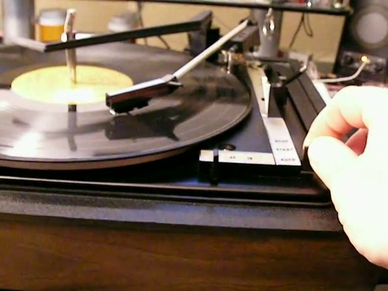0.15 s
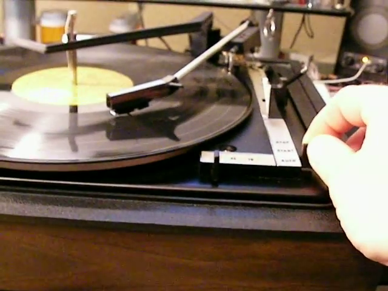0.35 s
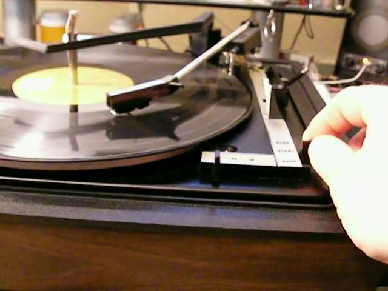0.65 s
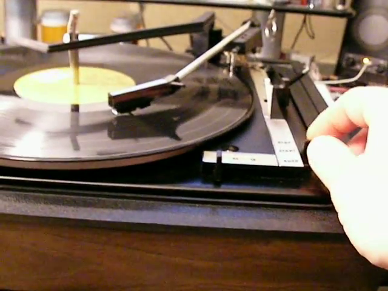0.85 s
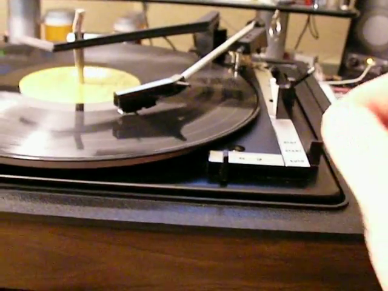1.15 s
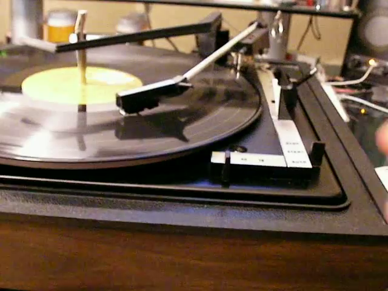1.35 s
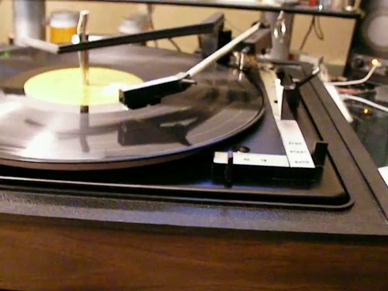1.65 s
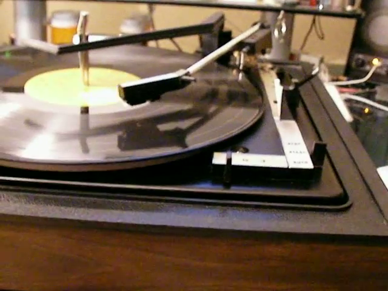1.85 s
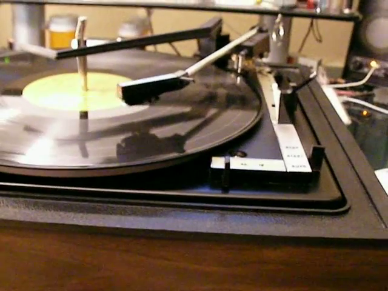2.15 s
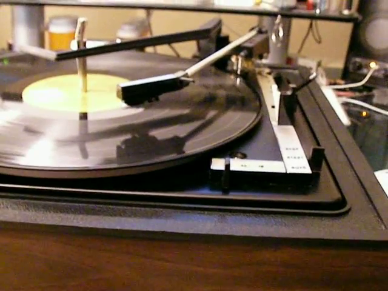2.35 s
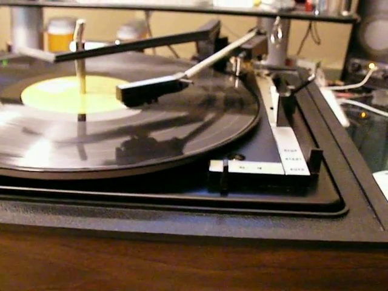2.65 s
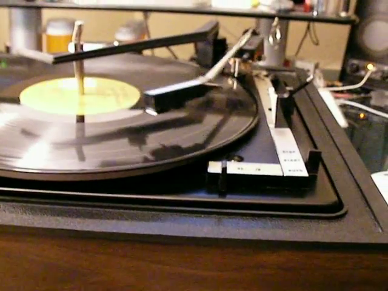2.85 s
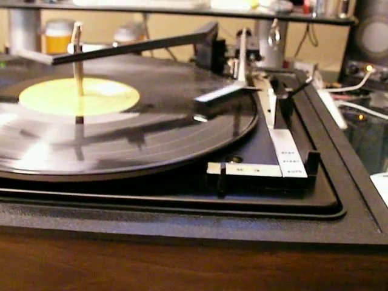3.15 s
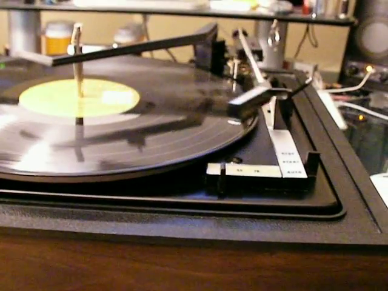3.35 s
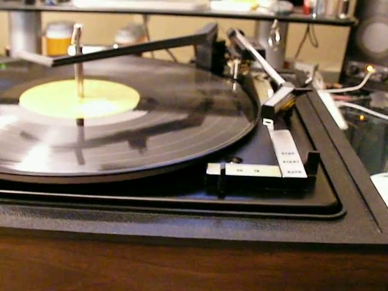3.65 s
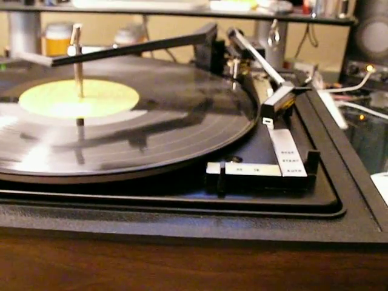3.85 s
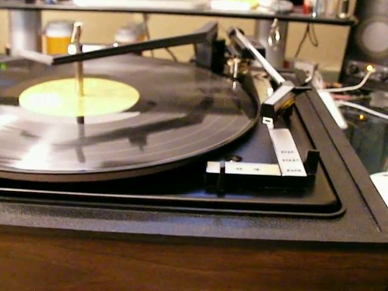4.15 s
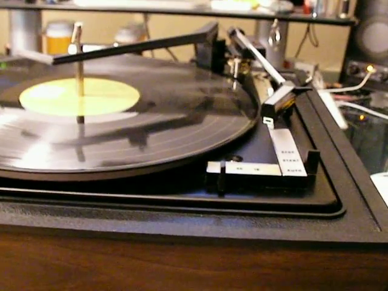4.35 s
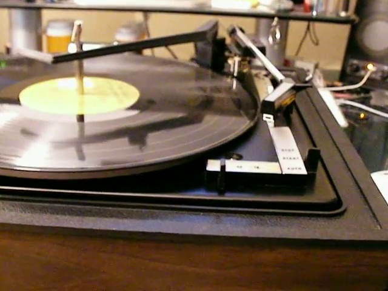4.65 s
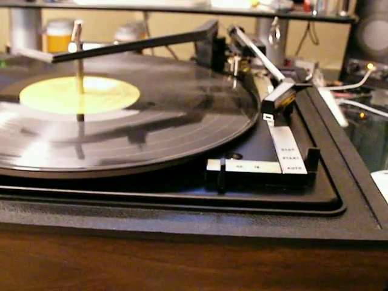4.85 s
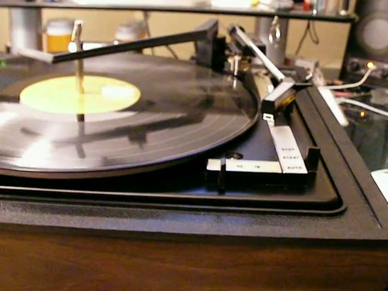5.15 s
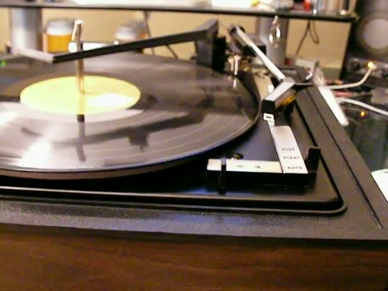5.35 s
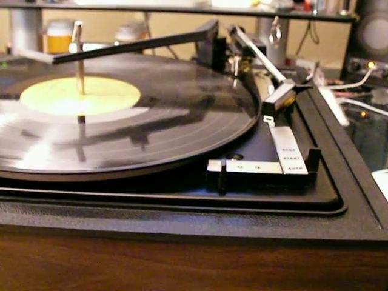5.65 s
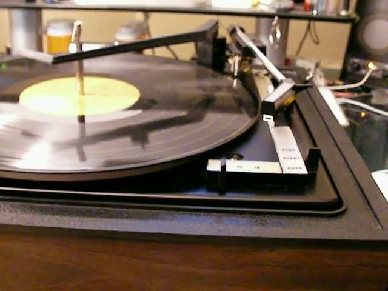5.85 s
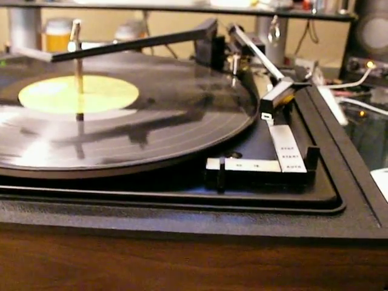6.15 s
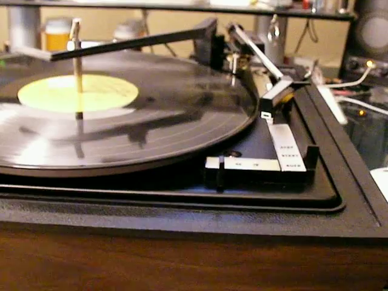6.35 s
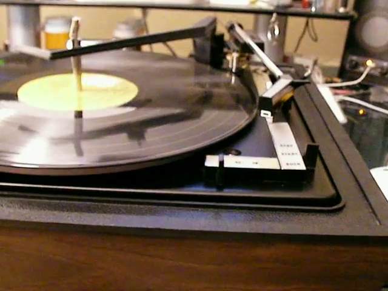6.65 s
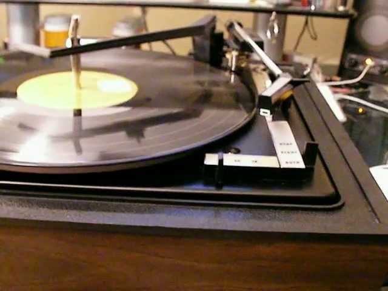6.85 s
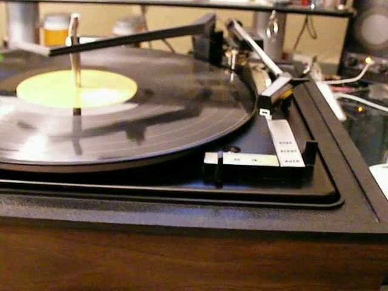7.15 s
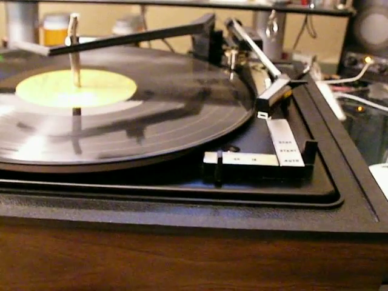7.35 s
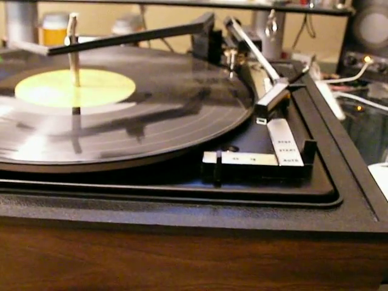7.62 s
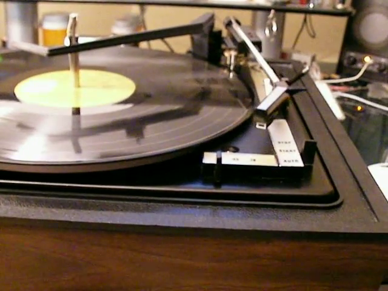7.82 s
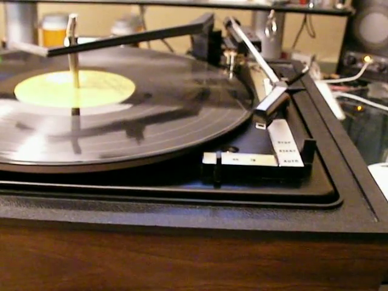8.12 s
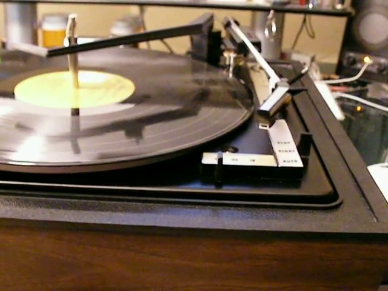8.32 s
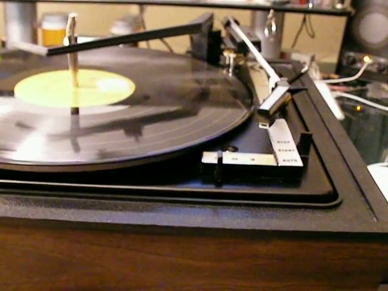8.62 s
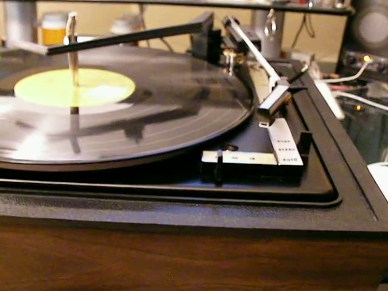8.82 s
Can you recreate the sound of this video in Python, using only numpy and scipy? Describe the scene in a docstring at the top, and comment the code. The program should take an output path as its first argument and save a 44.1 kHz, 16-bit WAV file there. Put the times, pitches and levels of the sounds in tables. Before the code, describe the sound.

Metal levers and latches snap, tick and knock on a wooden-cased turntable. An opening cluster with dull thumps gives way to only hum and hiss, then scattered clicks and a brief scrape, another pause, bright clacks with a short singing lever, light ticks, and a heavy final clatter. The sound is dry and close, with short indoor reflections and a slightly noisy stereo microphone.

```python
"""Crisp clicks, clacks and dull knocks: a record changer runs through its cycle on a wooden cabinet, heard close up.
A hand trips the lever, cams and latches click as the arm lifts and swings out, and the switch clunks off: each
contact is a set of ringing metal modes under a crack of noise. A long lever sings, parts rasp along the cam, and
the sprung deck shudders as low resonances. Behind them the motor hums in sines on multiples of the mains, over
a steady hiss of shaped noise in a small room. A small stereo microphone colours it all."""
import sys
import numpy as np
from scipy import signal
from scipy.fft import rfft, irfft, next_fast_len
from scipy.io import wavfile
from scipy.ndimage import uniform_filter1d, map_coordinates

SR = 44100
rng = np.random.default_rng(int(sys.argv[2]) if len(sys.argv) > 2 else 0)


def wav_out(sig):
    """Save sig, one row per channel (or a flat mono array), as 16-bit PCM at SR to the path in sys.argv[1]."""
    wavfile.write(sys.argv[1], SR, np.round(np.clip(np.atleast_2d(sig).T, -1, 1) * 32767).astype(np.int16))


N = 396194


def amp(db):
    """Gain of a dB value."""
    return 10 ** (np.asarray(db) / 20)


def unit(x):
    """x at rms 1."""
    return x / np.sqrt(np.mean(x ** 2) + 1e-20)


def along(points, hz):
    """Read (Hz, value) points at any frequency, on a log axis."""
    point_hz, value = np.transpose(points)
    return np.interp(np.log(hz + 1), np.log(point_hz + 1), value)


def curve(rows):
    """Gain per sample through (s, dB) rows, silent outside them."""
    time_s, level_db = np.transpose(list(rows))
    return amp(np.interp(np.arange(N) / SR, time_s, level_db, left=-150, right=-150))


def wobble(rate):
    """A smooth random curve with rate knots a second."""
    knots = rng.standard_normal(int(N * rate / SR) + 4)
    return map_coordinates(knots, [np.arange(N) * rate / SR])


def filtered(x, response):
    """x shaped by a complex response of frequency."""
    size = next_fast_len(N + SR // 2)
    return irfft(rfft(x, size) * response(np.fft.rfftfreq(size, 1 / SR)), size)[..., :N]


def resonance(f, hz, width_hz):
    """Causal response of one mode, 1 at its centre."""
    return 1j * f * width_hz / (hz * hz - f * f + 1j * f * width_hz)


# modes of the metal mechanism: pitch_hz [Hz], level_db [dB], t60_s [s, at ring scale 1]
METAL_MODES = [(706, -10.5, 0.75), (831, -3, 0.55), (1004, 0, 0.37), (1399, 0, 0.14), (1970, 4.5, 0.065),
               (2770, -4, 0.08), (3384, -20, 0.11), (3430, 4.5, 0.014), (3944, -1.5, 0.041),
               (4600, -3.5, 0.051), (6530, -4, 0.099), (11340, -6.5, 0.02), (13400, -12, 0.014)]


def metal(f, width):
    """Response of the mechanism, each mode as wide as a share of its pitch, in alternating polarity."""
    return sum((-1) ** k * amp(db) * resonance(f, hz, width * hz)
               for k, (hz, db, _) in enumerate(METAL_MODES))


# parts a contact sets off (cabinet, plate, levers, pins, springs): low_hz [Hz], high_hz [Hz]
PART_BANDS = [(600, 1250), (1400, 2500), (2800, 4600), (4700, 7300), (8700, 13900)]
SNAP_DB, SNAP_T60_S = 7, .032  # first touch, before the band is levelled; t60 at ring scale 1
TOUCH_S, SOFT_S = .0006, .002  # rise of a contact; rise added at ring scale 1
CHATTER_DB, MODE_SPREAD_DB = 3.5, 2  # unevenness of the rattle; scatter of the modes from blow to blow


def struck(band_db, scale):
    """One contact: in each band the modes ring at new strengths under a crack of noise; the mid peaks at its dB."""
    t = np.arange(SR // 5) / SR
    f = np.fft.rfftfreq(len(t), 1 / SR)
    colour = np.abs(metal(f, width=.07)) + amp(-5)  # the noise leans toward the modes
    hz, db, t60_s = np.transpose(METAL_MODES)[..., None]
    strength, detune = rng.standard_normal((2, len(METAL_MODES), 1))

    # loose parts blur each ring
    drift = .04 * np.cumsum(rng.standard_normal((len(METAL_MODES), len(t))), axis=1)
    ring_gain = amp(db + MODE_SPREAD_DB * strength - 60 * t / (scale * t60_s))
    rings = ring_gain * np.sin(2 * np.pi * hz * (1 + 0.009 * detune) * t + drift)

    # loose parts touch unevenly
    knots = rng.standard_normal(len(t) // 128 + 4)
    chatter = amp(CHATTER_DB * map_coordinates(knots, [np.arange(len(t)) / 128]))
    snap = amp(SNAP_DB - 60 * t / (scale * SNAP_T60_S))
    touch = 1 - np.exp(-(t / (TOUCH_S + SOFT_S * scale ** 3)) ** 2)

    total = 0
    for (low, high), level_db in zip(PART_BANDS, band_db):
        band = 1 / np.sqrt((1 + (f / high) ** 12) * (1 + (low / (f + 1)) ** 12))
        noise = rfft(rng.standard_normal((2, len(t))))
        shared, apart = unit(irfft(noise * band * colour, len(t)))
        apart = apart * np.clip(low / 8000, 0, .55)  # short waves reach the two ports unlike
        fade_db = -60 * t / scale * (low / 1250) ** 0.3  # small parts come to rest sooner
        rattle = amp(-5.5 + fade_db / 0.39)
        settling = amp(-6.5 + fade_db / 0.11)
        force = snap + chatter * (rattle + settling)
        crack = force * np.array([shared + apart, shared - apart])
        in_band = (hz[:, 0] > low) & (hz[:, 0] < high)
        part = (rings[in_band].sum(0) + crack) * touch
        total = total + amp(level_db) * part / np.abs(part.mean(0)).max()
    return total


# decay of the small room: pitch_hz [Hz], t60_s [s]
ROOM_DECAY = [(300, 0.35), (2000, 0.27), (10000, 0.15)]


def echoes(x):
    """A fresh noise tail of the room for one sound; each frequency dies at its own speed."""
    hz, t, z = signal.stft(rng.standard_normal((2, SR // 3)), SR, nperseg=256)
    fading = amp(-60 * t / along(ROOM_DECAY, hz)[:, None])
    tail = signal.istft(z * fading, SR, nperseg=256)[1]
    late = np.pad(x, (150, 0))  # delay in samples
    return signal.fftconvolve(late[None], tail / np.linalg.norm(tail[0]), axes=1)


# contacts of the mechanism: start_s [s], plate_db [peak dB], lever_db [dB above the plate],
# hard_db [hardness: pins, dB above the plate], weight_db [cabinet knock, dB above the plate],
# ring_scale [times the decay, held within 0.2 to 3]; dB before room and microphone
CONTACTS = [(0.098, -43, 9, -1, -6, 0.61), (0.381, -23.5, 9.5, 11.5, -30, 0.17),
            (0.5242, -17.5, 0.5, -18, -11, 0.37), (0.571, -32.5, -4, -17, -5, 0.85),
            (0.607, -30, 3, 0, -22, 0.59), (0.881, -31.5, -5, -10.5, -13, 0.76),
            (1.102, -45, 2, 1.5, -15, .4), (2.745, -28, -3, -5.5, -7, 0.67),
            (3.3223, -39, -4.5, -18, -13, 0.73), (3.4416, -21.5, -2, -3, -14, 0.54),
            (3.61, -41.5, -2.5, -10, -2, 0.66), (3.874, -34, -6, -23, -20, 0.85),
            (3.885, -39.5, 7, -13, -15, 0.66), (3.933, -23, 7.5, 4, -9, 0.58),
            (4.042, -28.5, -1.5, -13.5, -11.5, 0.44), (5.221, -12.5, -1.5, -19, -29, 0.23),
            (5.3395, -31.5, -6, -17, -4, 0.69), (5.6143, -20, 0.5, -23, -22, 0.36),
            (5.936, -31.5, -5, -17, -14, 0.92), (5.988, -25, -6, -22.5, -34, 0.51),
            (6.0013, -24.5, -9.5, -27, -12.5, 0.81), (6.065, -39.5, 3.5, -7.5, -19, 0.52),
            (6.7376, -30, -1.5, -9, -7.5, 0.75), (7.27, -42, -2, -18, -15, 1.1),
            (7.625, -38, -5, -22, -4.5, 0.74), (7.7354, -35, -4.5, -20, -9, 0.81),
            (7.786, -43.5, 5, -2, -12, 0.67), (8.08, -17, 1.5, -15.5, -35, 0.2),
            (8.168, -20, -4, -7, -22, 0.96), (8.1747, -25, 2, 1, -12, 0.44),
            (8.179, -13.5, -2, -6, -14, 0.31), (8.1834, -30.5, 1, 18, 2.5, 0.17),
            (8.187, -31.5, 19.5, 15, -24, 0.4), (8.2167, -33.5, 8.5, 2, 1.5, 0.82),
            (8.3767, -23.5, 3.5, 8, -6, 0.47), (8.391, -28, 3, -6, -5, 0.65)]
# springs answer harder contacts more: base_db [dB above the plate at hardness 0], slope [dB per dB of hardness]
SPRING_REACH = (-1.1, 1.18)


def clicks():
    """Each contact reaches the parts of the mechanism by its hardness and weight, and the room answers."""
    out = np.zeros((2, N + SR))
    for start_s, plate_db, lever_db, hard_db, weight_db, ring_scale in CONTACTS:
        spring_db = SPRING_REACH[0] + SPRING_REACH[1] * hard_db
        above_plate_db = np.array([weight_db, 0, lever_db, hard_db, spring_db])
        blow = struck(plate_db + above_plate_db, np.clip(ring_scale, .2, 3))
        wet = amp(-8) * echoes(blow.mean(0))
        start = round(start_s * SR)
        out[:, start:start + blow.shape[1]] += blow
        out[:, start:start + wet.shape[1]] += wet
    return out[:, :N]


# a long lever springs back after the heavier contacts and sings:
# start_s [s], level_db [dB before rise, throb and decay], t60_s [s]
LEVER_TWANGS = [(.53, -31, 0.13), (5.235, -30, 0.3), (5.342, -36, 0.14), (5.62, -35.5, 0.18),
                (8.089, -26.5, 0.14), (8.25, -37.5, 0.53), (8.391, -37.5, 0.44)]
TWANG_HZ, TWANG_RISE_S = 1647, 0.0052
THROB_DEPTH, THROB_HZ = .6, 85


def twangs():
    """The long lever as one drifting mode that swells, throbs and dies."""
    out, t = np.zeros(N + SR), np.arange(SR // 3) / SR
    for start_s, level_db, t60_s in LEVER_TWANGS:
        drift = .07 * np.cumsum(rng.standard_normal(len(t)))
        throb = 1 + THROB_DEPTH * np.cos(2 * np.pi * (THROB_HZ * t + rng.random()))
        rise = 1 - np.exp(-(t / TWANG_RISE_S) ** 2)
        decay = amp(level_db - 60 * t / t60_s)
        start = round(start_s * SR)
        out[start:start + len(t)] += decay * rise * throb * np.sin(2 * np.pi * TWANG_HZ * t + drift)
    return out[:N]


# parts sliding on the cam: start_s [s], rise_s [s], hold_s [s], fall_s [s], rasp_db [rms dB of the rasp in the hold]
CAM_SLIDES = [(0.306, 0.057, 0.033, 0.49, -43), (3.81, 0.11, 0.016, .05, -41.5),
              (8.128, 0.027, 0.26, 0.25, -42)]
# colour of the rasp: pitch_hz [Hz], level_db [relative dB per Hz]
RASP_COLOUR = [(300, -8), (700, -6), (1200, -3), (1700, -1), (2500, -8), (5000, -6), (7000, -13.5),
               (11500, -14.5), (14000, -43)]
SLIDE_EDGE_DB = -32.5  # a slide rises from and falls to this far under its level
# loose parts chattering in a slide: mean rate, scatter of the ticks, level over the rasp
RATTLE_PER_S, RATTLE_SPREAD_DB, RATTLE_DB = 800, 3, 0


def slides():
    """Metal on metal: a rasp of noise, and dense uneven ticks that ring the mechanism."""
    a, b = filtered(rng.standard_normal((2, N)), lambda hz: amp(along(RASP_COLOUR, hz)))
    rasp = unit(amp(0.27 * wobble(56)) * np.array([a + .5 * b, a - .5 * b]))

    hits = rng.random(N) < RATTLE_PER_S / SR
    strength = amp(RATTLE_SPREAD_DB * rng.standard_normal(N))
    ticks = hits * strength * np.sign(rng.standard_normal(N))
    rattle = unit(filtered(ticks, lambda hz: metal(hz, width=0.2) * amp(along(RASP_COLOUR, hz))))

    strokes = 0
    for start_s, rise_s, hold_s, fall_s, rasp_db in CAM_SLIDES:
        corners_s = np.cumsum([start_s, rise_s, hold_s, fall_s])
        corners_db = rasp_db + SLIDE_EDGE_DB * np.array([1, 0, 0, 1])
        strokes = strokes + curve(zip(corners_s, corners_db))
    return strokes * (rasp + amp(RATTLE_DB) * rattle)


# modes of the sprung deck: pitch_hz [Hz], width_hz [Hz, when pushed], level_db [dB]
DECK_MODES = [(137.6, 11.7, -2.5), (214.5, 5.4, -10), (250.6, 11.8, -3), (305.5, 17, -15)]
# pushes on the deck: start_s [s], push_db [dB, added to each mode's level],
# low_db [dB added to the lowest mode], length_s [s]
DECK_PUSHES = [(0.207, -39, -9, 0.015), (0.25, -38.5, -17, 0.028), (0.396, -18.5, -8.5, 0.052),
               (0.528, -27, -11, 0.011), (0.569, -21, -7, 0.02), (0.655, -25, -8, 0.036),
               (0.714, -28, 1.5, 0.023), (0.762, -40, 9, 0.013), (0.811, -33, -0.5, 0.033),
               (1.183, -37, -7, 0.03), (1.351, -26, 1.5, 0.018), (5.216, -28.5, -27, 0.023),
               (5.325, -28.5, -12.5, 0.026), (8.177, -19, -2, 0.0061), (8.225, -34, 4, 0.042),
               (8.281, -45, 21, 0.053), (8.364, -31.5, 3, 0.029)]
# the deck trembling on its springs: time_s [s], level_db [rms dB]
DECK_TREMBLE = [(0, -53), (.35, -48.5), (.45, -47), (.8, -48), (1.6, -53.5), (8.15, -53), (8.19, -51),
                (8.38, -33), (8.58, -51.5), (8.98, -52)]


def deck():
    """Pushes swell and release the deck's modes; running friction, as noise, keeps them trembling."""
    out, t = np.zeros(N + SR), np.arange(SR // 3) / SR
    for start_s, push_db, low_db, length_s in DECK_PUSHES:
        swell = np.sin(np.pi / 2 * np.clip(t / np.clip(length_s, .002, .1), 0, 1)) ** 2
        released_s = np.maximum(t - length_s, 0)
        start = round(start_s * SR)
        for k, (hz, width_hz, level_db) in enumerate(DECK_MODES):
            detune = 1 + 0.0345 * rng.standard_normal()
            phase = 2 * np.pi * (hz * detune * t + rng.random())
            gain = amp(push_db + level_db + (low_db if k == 0 else 0))
            decay = np.exp(-np.pi * width_hz * released_s)
            out[start:start + len(t)] += gain * swell * decay * np.sin(phase)
    pushed = out[:N]

    def trembling_modes(f):
        """The deck's modes, broadened under friction."""
        return sum((-1) ** k * amp(db) * resonance(f, hz, 3.9 * width_hz)
                   for k, (hz, width_hz, db) in enumerate(DECK_MODES))

    a, b = filtered(rng.standard_normal((2, N)), trembling_modes)
    tremble = curve(DECK_TREMBLE) * unit(np.array([a + 1.38 * b, a - 1.68 * b]))
    # a quarter turn of phase: the two ports see the deck a little out of step
    askew = filtered(pushed, lambda f: 1j * np.ones_like(f))
    return np.array([pushed + 0.041 * askew, pushed - 0.052 * askew]) + tremble


# wavering motor tones: multiple [times the mains], level_db [rms dB the tone wavers around]
HUM_TONES = [(1, -73), (2, -59.5), (3, -57), (9, -72), (10, -72), (11, -71.5), (12, -71.5)]
# the fourth multiple swells and fades: time_s [s], level_db [rms dB]
FOURTH_SWELL = [(0, -52.5), (1.8, -52), (3.1, -65), (4.7, -52.5), (6.4, -52.5), (7.4, -62.5), (8.98, -59.5)]
MAINS_HZ = 59.95


def hum():
    """Motor hum: sines on multiples of the mains, a little late on the left; all but the fourth waver."""
    t = np.arange(N) / SR

    def tone(multiple):
        """One sine at rms 1, its phase split between left and right."""
        phase = 2 * np.pi * (multiple * MAINS_HZ * t + rng.random())
        return np.sqrt(2) * np.sin(phase + [[-.15], [.15]])

    steady = sum(amp(db + 1.6 * wobble(2.7)) * tone(k) for k, db in HUM_TONES)
    return steady + curve(FOURTH_SWELL) * tone(4)


# colour of the hiss: pitch_hz [Hz], level_db [relative dB per Hz]
HISS_COLOUR = [(30, -1), (90, -0.5), (125, 5), (280, 1.5), (350, -20), (500, -13), (750, -2), (1250, -11),
               (2000, -8.5), (2700, -12), (5600, -16), (9000, -27.5), (13000, -19.5)]
# how alike left and right are: pitch_hz [Hz], likeness [-1 to 1]
HISS_LIKENESS = [(60, -0.14), (180, -0.52), (530, 0.42), (1570, 0.26), (4640, 0.09), (13800, 0.36)]
HISS_DB = -46.5  # rms dB, before a very slight wobble


def hiss():
    """Room air and microphone noise, little alike on the two sides, lightly patchy in time and pitch."""
    z = signal.stft(rng.standard_normal((2, N)), nperseg=512)[2]
    smooth = uniform_filter1d(rng.standard_normal(z.shape[1:]), size=6, axis=0)
    patches = unit(uniform_filter1d(smooth, size=8, axis=1))
    pair = signal.istft(z * amp(1.7 * patches), nperseg=512)[1][:, :N]

    def mid_side(hz):
        """Share the colour between mid and side so the two ports are as alike as the table says."""
        turn = np.arccos(np.clip(along(HISS_LIKENESS, hz), -1, 1)) / 2
        return amp(along(HISS_COLOUR, hz)) * np.array([np.cos(turn), np.sin(turn)])

    mid, side = filtered(pair, mid_side)
    return amp(HISS_DB + 0.042 * wobble(1.0)) * unit(np.array([mid + side, mid - side]))


def scene():
    """All sources at the microphone."""
    return clicks() + twangs() + slides() + deck() + hum() + hiss()


# colour of the microphone, with a deaf band: pitch_hz [Hz], level_db [dB]
MIC_COLOUR = [(6500, 1.5), (7300, 0.5), (7700, -20), (8200, -11.5), (8700, 5.5), (9500, 10), (13500, 4.5),
              (13800, -76), (14300, -32)]
TOP_HZ = 14300  # band limit


def record(dry):
    """The microphone is weak in the deep bass and deaf in one treble band; nothing passes above the band limit."""
    def response(hz):
        """A very broad resonance, applied twice, times the treble colour."""
        return resonance(hz, 2950, 103500.0) ** 2 * amp(along(MIC_COLOUR, hz)) * (hz < TOP_HZ)

    return filtered(dry, response)


dry = scene()
out = record(dry)
wav_out(out)
```